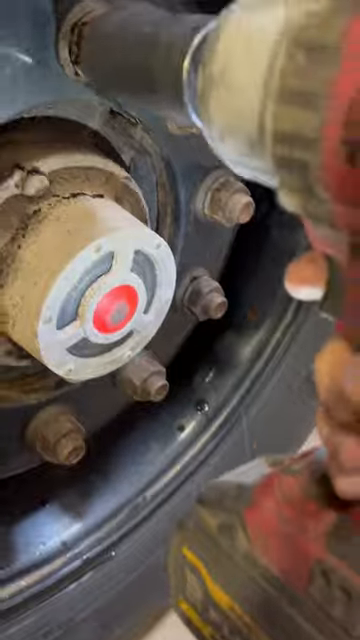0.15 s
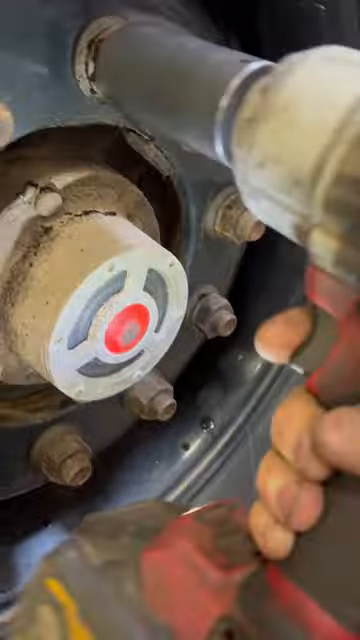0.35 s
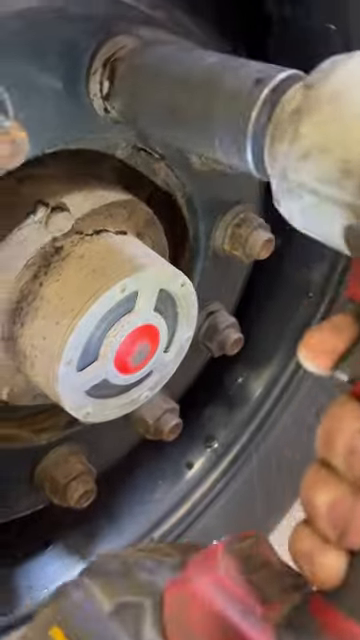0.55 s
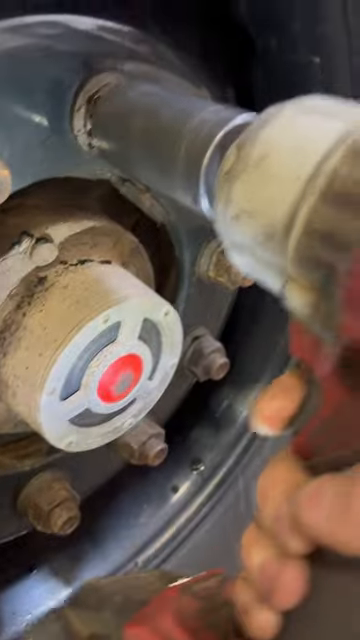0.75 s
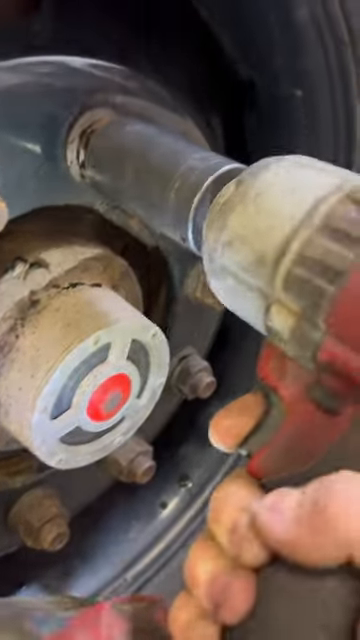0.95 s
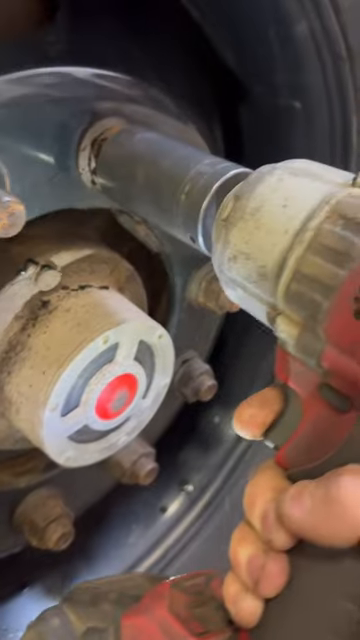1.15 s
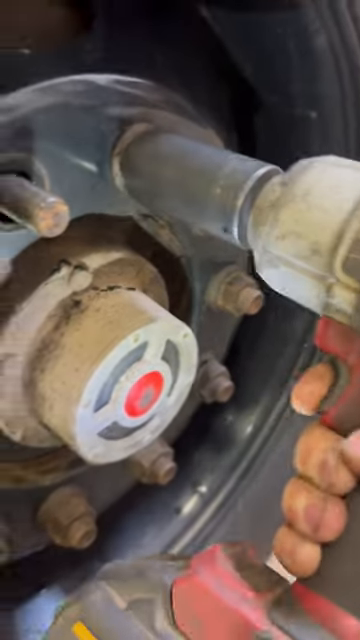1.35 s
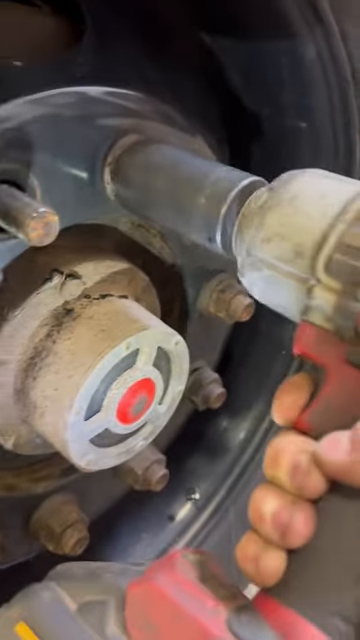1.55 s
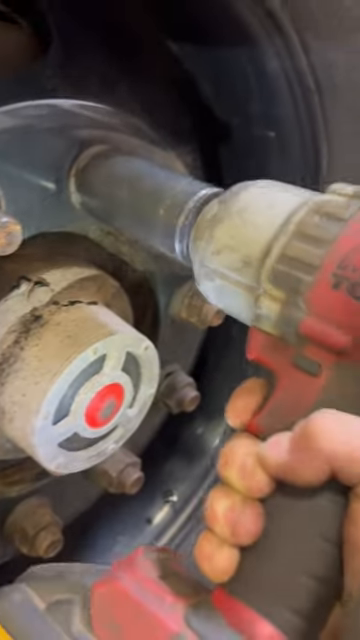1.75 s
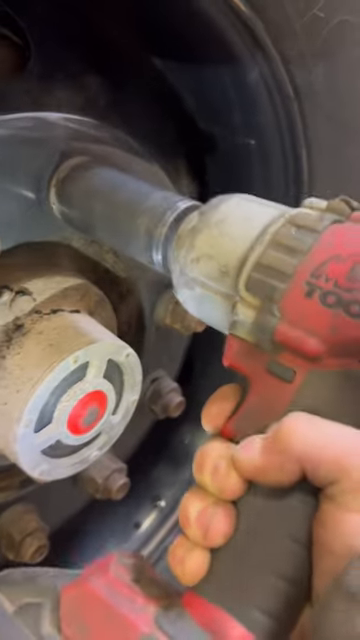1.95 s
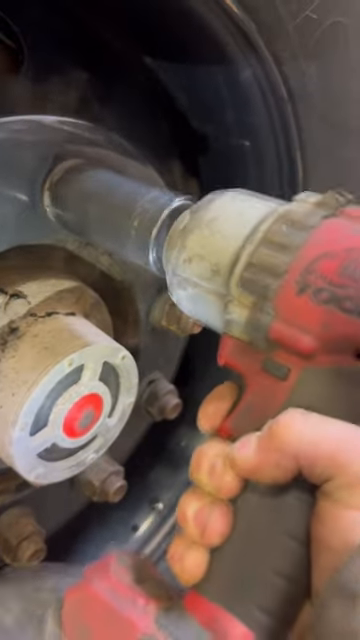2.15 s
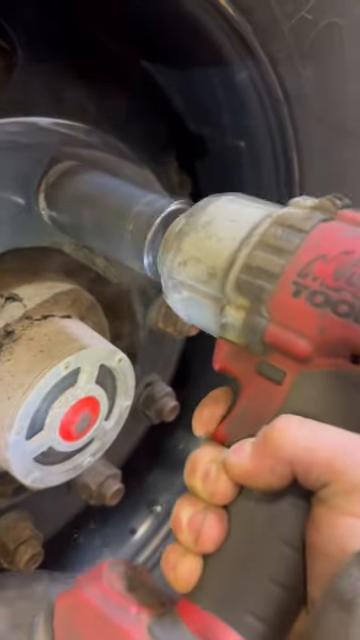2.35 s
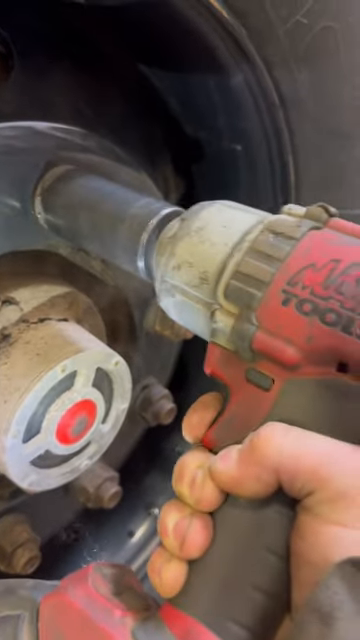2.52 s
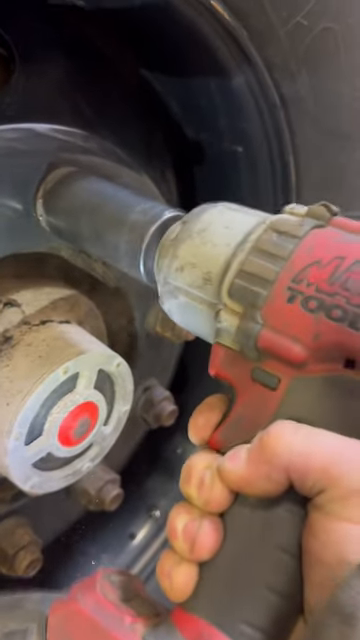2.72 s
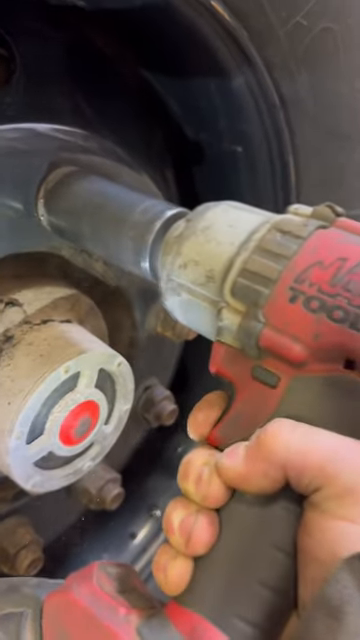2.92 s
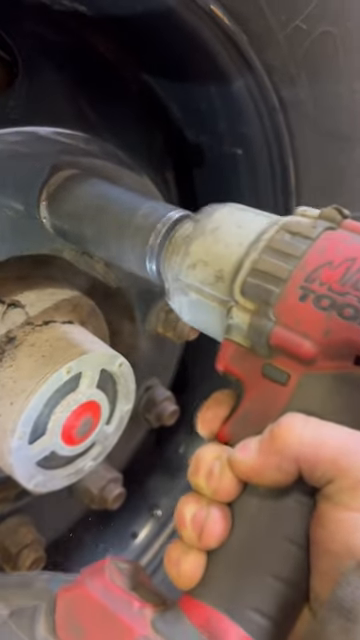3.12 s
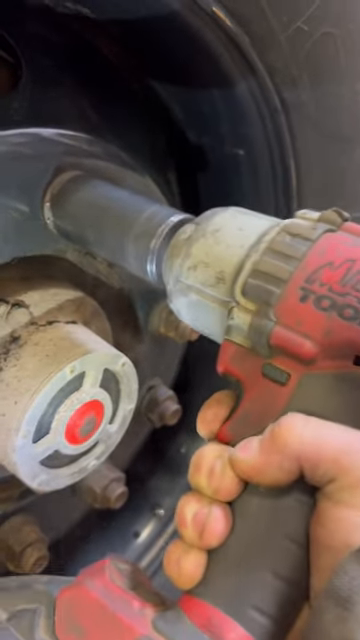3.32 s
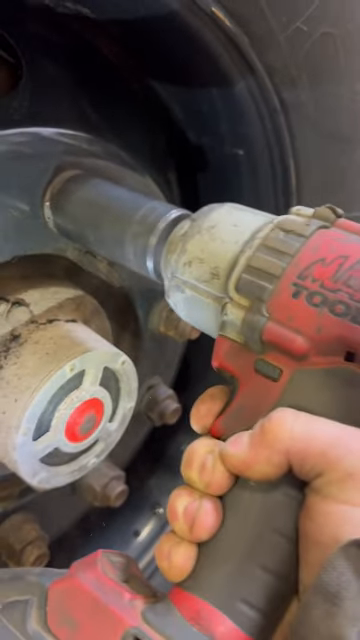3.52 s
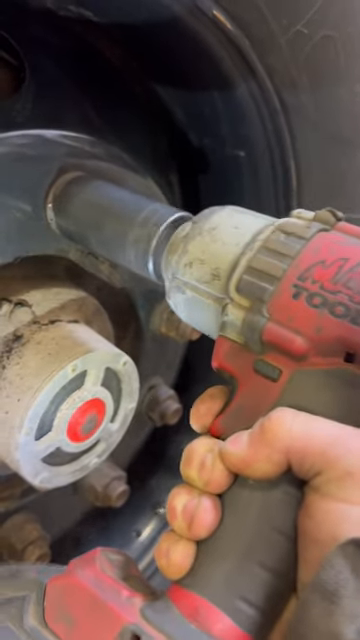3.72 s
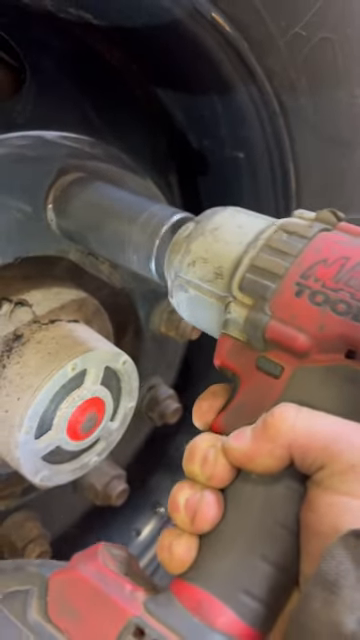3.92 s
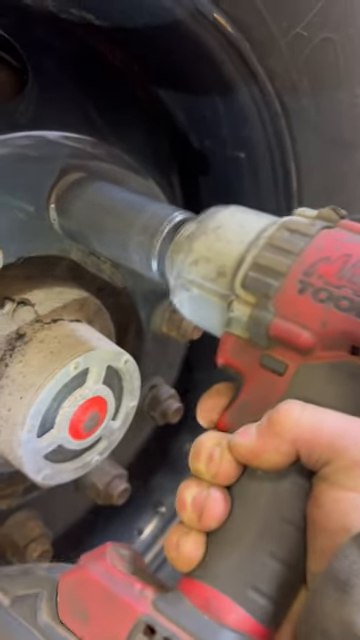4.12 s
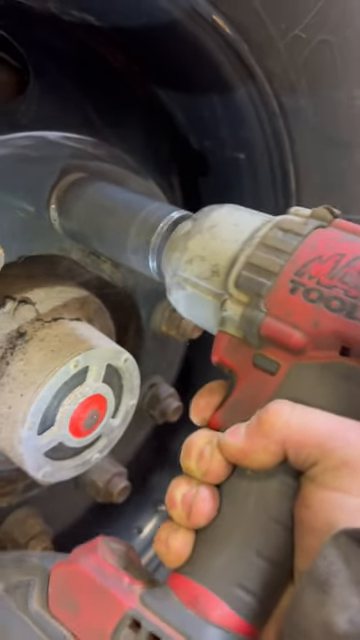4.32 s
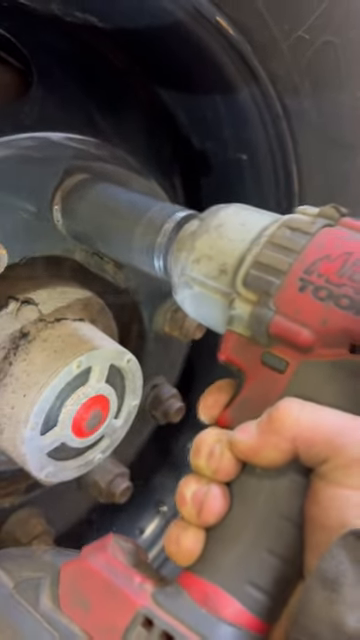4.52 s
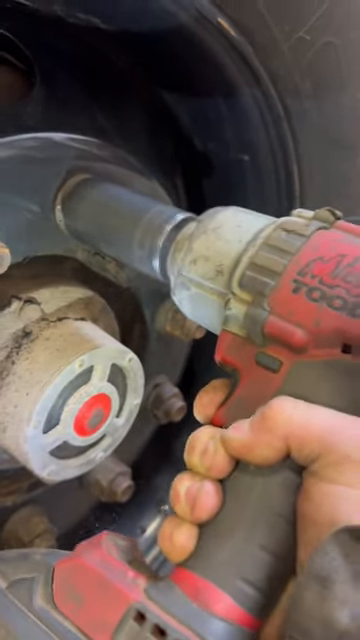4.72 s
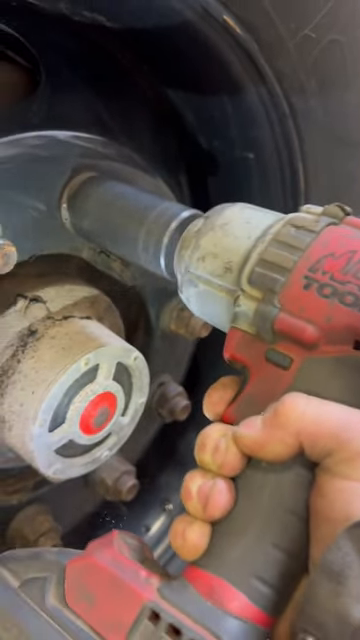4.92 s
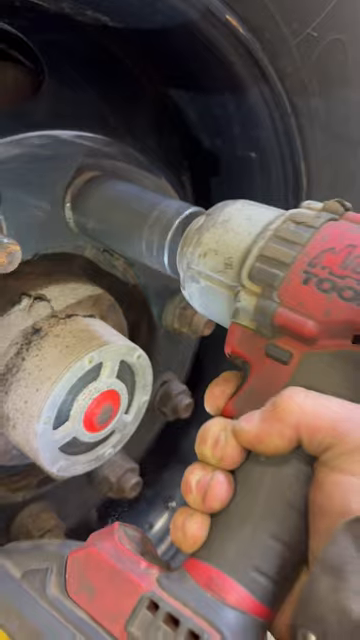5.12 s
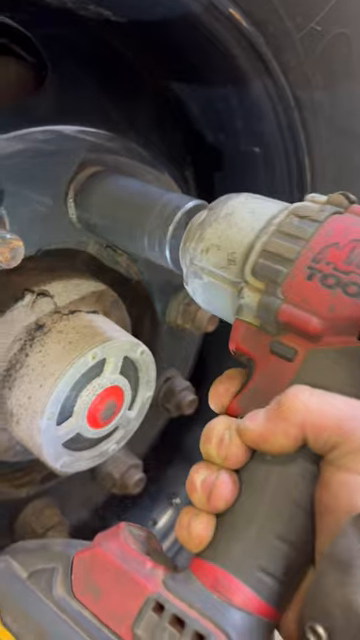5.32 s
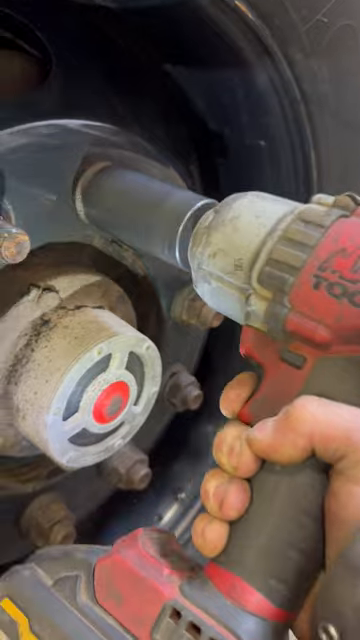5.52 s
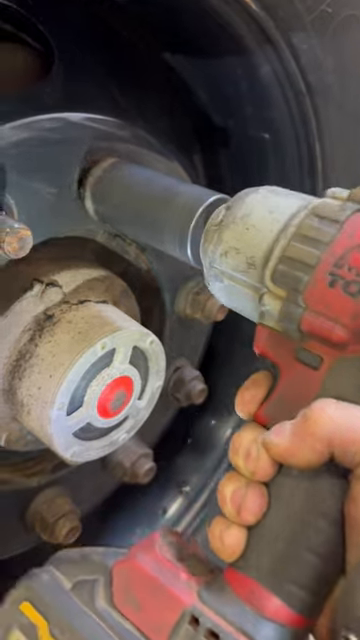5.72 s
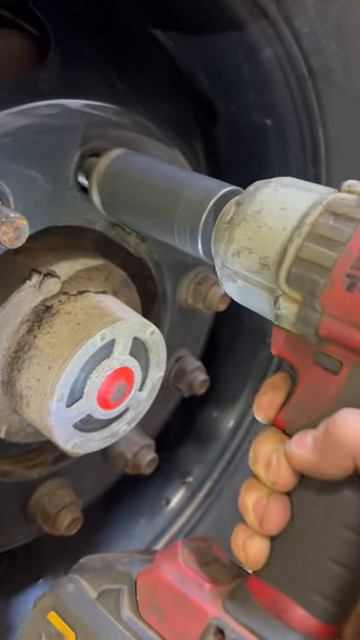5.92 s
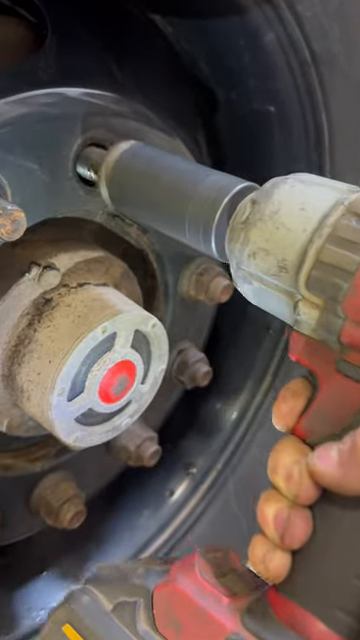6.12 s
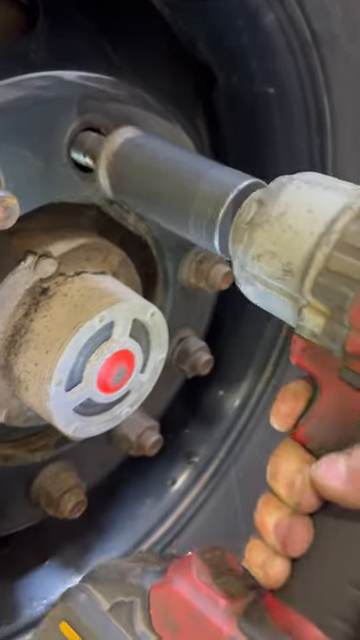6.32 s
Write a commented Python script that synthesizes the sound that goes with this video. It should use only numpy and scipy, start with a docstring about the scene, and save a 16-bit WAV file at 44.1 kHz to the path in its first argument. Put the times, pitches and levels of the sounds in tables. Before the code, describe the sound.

Close up in a quiet, faintly humming garage, a loose metal socket ticks, knocks and slides onto a truck wheel nut, ending in one hard clack. A cordless impact wrench bursts into dense, loud hammering, heaviest at first, then steady and slightly quickening. The blows turn uneven and stop as the nut loosens, leaving a much quieter whining motor.

```python
"""A socket knocks, ticks and slides onto a truck wheel nut, then a cordless impact wrench rattles on it about
46 times a second; the nut comes free and the motor whines without load. Heard close by through two ports.
Hits are bursts of signed noise with rebounds, ringing socket, anvil and wheel modes; sliding and whirr are
coloured noise; the free motor is sine tones with throbbing gear mesh."""
import sys
import numpy as np
from scipy import signal
from scipy.fft import rfft, irfft, next_fast_len
from scipy.io import wavfile

SR = 44100
rng = np.random.default_rng(int(sys.argv[2]) if len(sys.argv) > 2 else 0)


def store_pcm(level_fs):
    """Save levels as 16-bit WAV."""
    pcm = np.round(np.clip(level_fs, -1, 1) * 32767).astype(np.int16)
    wavfile.write(sys.argv[1], SR, np.atleast_2d(pcm).T)


N = 284886

# Socket and anvil modes. Each row: frequency in Hz, relative level in dB, t60 in s (seating stretches it).
SOCKET_MODES = [(3360, -35.5, 0.21), (5640, -21.5, 0.073), (6170, -25, 0.044), (6930, -14.5, 0.022),
                (8600, -33, 0.099), (9100, -39, 0.018), (8300, -5.5, 0.04), (8360, -12.5, 0.012),
                (8470, -12.5, 0.0089), (8407, -14, 0.034)]
# Wheel disc modes. Each row: frequency in Hz, relative level in dB, t60 in s (hammering shortens it).
WHEEL_MODES = [(432, -4.5, 0.25), (451, -5.5, 0.17), (832, -9, 0.07), (1009, -9.5, 0.079)]
# Brief modes of ticks and rasp. Each row: frequency in Hz, relative level in dB, t60 in s.
TICK_MODES = [(2720, -1, .014), (3440, 2, 0.013), (3850, -3, 0.013), (6030, -9, .01), (7600, -13, .008)]


def amp(db):
    """Amplitude factor of a level in dB."""
    return 10 ** (np.asarray(db) / 20)


def rms_one(x):
    """Scales a signal to an rms of 1."""
    return x / np.sqrt(np.mean(x ** 2) + 1e-20)


def in_time(rows):
    """Interpolates each column after the first (seconds) to one value per sample."""
    s, *columns = np.transpose(rows)
    return [np.interp(np.arange(N) / SR, s, c) for c in columns]


def at_hz(points, hz):
    """Interpolates (Hz, value) points over log frequency."""
    hz_points, values = np.transpose(points)
    return np.interp(np.log(hz + 1), np.log(hz_points), values)


def colour(x, spectrum):
    """Minimum-phase filter with the given spectral shape; white noise keeps its rms."""
    cepstrum = irfft(np.log(amp(at_hz(spectrum, np.linspace(0, SR / 2, 4097)))))
    cepstrum[1:4096] *= 2      # folding makes it causal
    response = irfft(np.exp(rfft(cepstrum[:4097], 8192)))
    return signal.fftconvolve(x, response / np.linalg.norm(response))[:N]


def filtered(x, order, hz, kind):
    """Butterworth filter."""
    return signal.sosfilt(signal.butter(order, hz, kind, fs=SR, output="sos"), x)


def ring(x, hz, t60):
    """Damped resonator: a unit click starts a sine of height 1."""
    r, w = amp(-60 / (t60 * SR)), 2 * np.pi * hz / SR
    return signal.lfilter([0, np.sin(w)], [1, -2 * r * np.cos(w), r * r], x + 1e-18)


def clicks(times, sizes):
    """Single-sample impulses at the given seconds."""
    out = np.zeros(N)
    np.add.at(out, np.minimum((times * SR).astype(int), N - 1), sizes)
    return out


def fading(x, t60):
    """Each click starts an exponential decay."""
    return signal.lfilter([1], [1, -amp(-60 / (t60 * SR))], x + 1e-18)


def drift(rate_hz):
    """Low-passed noise of rms 1 that wanders at about the given rate."""
    r = np.exp(-2 * np.pi * rate_hz / SR)
    return rms_one(signal.lfilter([1], [1, -2 * r, r * r], rng.standard_normal(N + SR))[SR:])


def chatter(times, level_db, fade_db_per_ms, spread_s, rebound_db, uneven_db, t60, tail_db, tail_t60, rise_s):
    """A first contact and five rebounds per hit; each is a fast-dying noise burst with a longer tail."""
    late_s = spread_s * np.cumsum(rng.uniform(0.34, 1.473, (len(times), 5)), axis=1)
    fade_db = np.reshape(fade_db_per_ms, (-1, 1)) * 10 ** 3 * late_s
    uneven = rng.normal(0, uneven_db, late_s.shape)
    rebounds = amp(level_db[:, None] + rebound_db - fade_db + uneven)
    contacts = clicks(times, amp(level_db))
    contacts = contacts + clicks((times[:, None] + late_s).ravel(), rebounds.ravel())
    envelope = fading(contacts, t60) + amp(tail_db) * fading(contacts, tail_t60)
    rise = np.exp(-1 / (rise_s * SR))      # the faces take a moment to close
    return signal.lfilter([1 - rise], [1, -rise], envelope) * rng.choice([-1., 1.], N)


def garage():
    """Steady room noise, mostly low."""
    # Each row: frequency in Hz, relative density in dB.
    garage_colour = [(18, -55), (30, -15), (87, -32), (101, 9), (122, 4), (240, 0.5), (420, -38),
                     (642, -43), (3000, -45), (3900, -69), (6600, -120)]
    return amp(-70) * colour(rng.standard_normal(N), garage_colour)


def grip():
    """The grip shifts: smooth pushes of the hand make soft low bumps."""
    # Each row: start in seconds, level in dB before the high-pass.
    bumps = [(6.125, -59), (6.16, -59), (6.222, -55), (6.285, -47), (6.34, -44)]
    bump_s = 0.0083
    s, bump_db = np.transpose(bumps)
    push = signal.fftconvolve(clicks(s, amp(bump_db)), np.hanning(int(bump_s * SR)))[:N]
    return filtered(push, 2, 45, "high")


def ticks():
    """Small ticks of the loose socket: short contacts ring brief modes, each with a random strength."""
    # Each row: time in seconds, relative level in dB.
    tick_rows = [(0.055, -36), (0.3744, -43), (0.5644, -49), (0.6244, -40), (0.6764, -46), (0.7497, -41),
                 (0.7851, -40), (0.7994, -46), (0.828, -51), (0.8435, -47), (0.8617, -51), (0.8804, -50),
                 (0.9143, -56), (0.9742, -56), (1.0445, -53), (1.2426, -53), (1.2571, -46)]
    s, tick_db = np.transpose(tick_rows)
    chance_db = rng.normal(0, 2.5, (len(s), len(TICK_MODES)))
    noise = rng.choice([-1., 1.], N)
    out = 0
    for k, (hz, mode_db, t60) in enumerate(TICK_MODES):
        contact = fading(clicks(s, amp(tick_db + mode_db - 19.5 + chance_db[:, k])), 0.0045)
        out = out + ring(noise * contact, hz, t60)
    return out


def seating():
    """Knocks are a bright tick and a soft push that rings the wheel; the socket slides in grains of noise."""
    # Knocks on nut and stud. Each row: time in seconds, relative tick, wheel thud and tyre boom levels in dB.
    knocks = [(0.041, -32, -40, -42), (0.1208, -28, -37, -42), (0.312, -49, -43, -54),
              (0.342, -49, -73, -68), (0.3547, -50.5, -63, -60), (0.4425, -42, -60, -62),
              (0.4487, -33, -53, -51), (0.5094, -20.5, -41.5, -40), (0.525, -51, -48, -53),
              (0.631, -39.5, -57, -53), (0.648, -38, -45, -38.5), (0.715, -24, -29.5, -28),
              (1.27, -59, -58, -52), (1.2859, -16, -17, -23), (6.2607, -45, -67, -72),
              (6.3456, -44, -61, -76), (6.4073, -44, -80, -77)]
    # Socket sliding on steel. Each row: time in seconds, hiss and rasp levels in dB.
    sliding = [(0, -75, -84), (.118, -61, -77), (.43, -63, -91), (.46, -56, -51), (.55, -65, -59),
               (.6, -64, -68), (.7, -47, -61), (.77, -62, -62), (.82, -59.5, -71), (1.2, -72.5, -82),
               (1.275, -45.5, -78), (1.335, -60, -52), (1.4, -66, -41), (1.45, -80, -80)]
    # Each row: frequency in Hz, relative density in dB.
    knock_colour = [(180, -20), (300, -16.5), (950, -9), (1360, -9), (2990, -12.5), (3280, -12.5),
                    (4980, -19.5), (7440, -14), (10400, -25), (12000, -67), (15600, -70), (22000, -120)]
    # Each row: frequency in Hz, relative density in dB.
    slide_colour = [(180, -20), (300, -17), (418, -11.5), (609, -23.5), (1780, -28), (3550, -35.5),
                    (4950, -37), (6300, -37), (11000, -45), (14300, -92), (22000, -120)]
    tyre_hz, tyre_t60_s = 170, 0.66
    s, peak_db, thud_db, boom_db = np.transpose(knocks)
    force = chatter(s, peak_db, fade_db_per_ms=3.1, spread_s=0.0066, rebound_db=-4.0, uneven_db=2.5,
                    t60=0.021, tail_db=-23.5, tail_t60=0.18, rise_s=0.00063)

    contact = clicks(s, amp(thud_db))
    contact = contact + amp(-25.5) * fading(contact, 0.17) * rng.standard_normal(N)
    push = filtered(contact, 2, [140, 1300], "band")
    wheel = sum(ring(push * amp(mode_db - 9.5), hz, t60) for hz, mode_db, t60 in WHEEL_MODES)
    thump = ring(push, 264, 0.029) + ring(push, 450, 0.022)
    boom = amp(-12.5) * ring(clicks(s, amp(boom_db)), tyre_hz, tyre_t60_s)
    socket = sum(amp(mode_db - 43) * ring(force, hz, t60 * 2.8) for hz, mode_db, t60 in SOCKET_MODES)

    grains = rms_one(rng.standard_normal(N) * amp(2.4 * drift(150) + 0.44 * drift(24)))
    hiss_db, rasp_db = in_time(sliding)
    hiss = amp(hiss_db) * colour(grains, slide_colour)
    rasp = sum(amp(mode_db + 3.6 * drift(25)) * ring(grains, hz, t60) for hz, mode_db, t60 in TICK_MODES)
    return colour(force, knock_colour) + wheel + thump + boom + socket + hiss + amp(rasp_db) * rms_one(rasp)


def motor():
    """Fan and bearing noise in housing modes; once free, two tones and gear mesh throbbing per socket turn."""
    # Each row: time in seconds, whirr level in dB.
    whirr_rows = [(1.33, -72), (1.39, -31), (1.415, -37), (1.5, -29), (2.2, -33.5), (5.3, -38.5),
                  (5.56, -40.5), (5.62, -48), (5.9, -47.5), (6.35, -48.5), (6.46, -50)]
    # Each row: frequency in Hz, relative density in dB.
    whirr_colour = [(120, -49), (200, -22), (430, -11.5), (540, -23.5), (700, -17.5), (850, -10.5),
                    (1300, -10.5), (1850, -12), (2290, -4.5), (2700, -8.5), (3300, -4.5), (3750, -11),
                    (4250, -9), (4600, -7.5), (4950, -13), (5250, -9), (5600, -8.5), (7100, -13.5),
                    (7640, -7), (11200, -20.5), (11900, -101), (13700, -80), (15100, -24), (15900, -20.5)]
    # Each row: frequency in Hz, level in dB relative to the coloured noise, t60 in s.
    housing_modes = [(2450, -27, 0.01), (3960, -16, 0.0032), (4450, -19, .012), (6130, -13, 0.0034)]
    # Free running. Each row: time in seconds, levels of tone, seventh harmonic, low mesh and high mesh in dB,
    # tone in Hz.
    free_rows = [(5.6, -63, -63, -58, -57, 926), (5.645, -60, -54, -51, -48, 938),
                 (5.69, -60, -51, -51, -58, 955), (5.745, -50, -47, -47, -55, 983),
                 (5.84, -54, -55, -48, -50, 1010), (5.91, -55, -60, -51, -50, 1022),
                 (5.96, -67, -50, -50, -49, 1029), (6.08, -56, -41.5, -53, -54, 1041),
                 (6.2, -58, -43, -62, -65, 1050), (6.388, -58, -47, -72, -66, 1046),
                 (6.46, -54, -61, -65, -61, 865)]
    # Faint singing of the loose socket. Each row: time in seconds, level in dB.
    loose_rows = [(5.6, -64), (6.05, -65), (6.2, -55), (6.3, -52), (6.46, -52)]
    # Low rumble as the grip shifts. Each row: time in seconds, level in dB.
    rumble_rows = [(5.6, -80), (5.68, -85), (5.9, -75), (6.1, -67), (6.15, -66), (6.37, -68), (6.42, -87)]
    rumble_colour = [(20, -20), (60, 23), (130, -5), (300, -27), (600, -53)]   # (Hz, relative dB)
    free_at_s, throb_peak_s, throb_db, motor_cycles_per_throb = 5.58, 5.947, 7, 32

    tone_db, seventh_db, mesh_db, upper_db, hz = in_time(free_rows)
    since_s = np.maximum(np.arange(N) / SR - free_at_s, 0)
    free = np.minimum(since_s / 0.029, 1)
    phase = 2 * np.pi * np.cumsum(hz) / SR
    tones = amp(tone_db + 3.0 * drift(25)) * np.sin(phase + 0.77 * drift(30))
    tones = tones + amp(seventh_db) * np.sin(7 * phase)

    turn = (phase - phase[int(throb_peak_s * SR)]) / motor_cycles_per_throb
    depth_db = throb_db * np.clip(since_s / 0.4, 0, 1)
    throb = amp(depth_db * (np.cos(turn + .3 * drift(8)) - 0.2) + 1.6 * drift(60))
    mesh = amp(mesh_db) * np.sin(1.52 * phase + 1.2 * drift(72))
    mesh = mesh + amp(upper_db) * np.sin(3.0 * phase + 0.51 * drift(60))

    air = rng.standard_normal(N) * amp(1.34 * drift(54))
    housing = sum(amp(mode_db) * rms_one(ring(air, mode_hz, t60)) for mode_hz, mode_db, t60 in housing_modes)
    running = np.arange(N) > whirr_rows[0][0] * SR
    whirr = amp(in_time(whirr_rows)[0]) * running * (colour(air, whirr_colour) + housing)

    singing = rms_one(sum(amp(mode_db) * ring(air, mode_hz, t60) for mode_hz, mode_db, t60 in SOCKET_MODES))
    loose = amp(in_time(loose_rows)[0] + 3.9 * drift(30)) * singing
    rumble_amp = amp(in_time(rumble_rows)[0] + 3.6 * drift(22))
    rumble = rumble_amp * colour(rng.standard_normal(N), rumble_colour)
    return whirr + free * (tones + throb * mesh + loose + rumble)


def blows():
    """Steady blows fall where the running count passes a whole number; uneven stumbles are added."""
    # Steady hammering quickens as the nut yields. Each row: time in seconds, blows per second.
    rate = [(1.5585, 44.631), (2.2, 44.907), (2.7, 45.474), (3.1, 45.368), (3.6, 45.98), (4.1, 46.235),
            (4.5, 46.854), (4.9, 46.812), (5.25, 47.467)]
    # Steady blows. Each row: time in seconds, force in dB.
    force_rows = [(1.55, -11), (1.95, -7), (2.1, -11.5), (2.6, -14.5), (3.1, -16.5), (3.38, -18),
                  (3.5, -16.5), (4.3, -16.5), (4.7, -18), (5.25, -17)]
    # Steady blows that differ from their neighbours. Each row: time in seconds, force change in dB,
    # rebound fade in dB per ms.
    distinct = [(2.183, -1.5, 0), (2.404, -5, -0.2), (2.472, 1.5, 1.3), (2.604, 5, 6), (2.914, -1, 2.5),
                (3.001, .4, 6), (3.023, -0.5, 0.3), (3.421, 4, 6.5), (3.701, 1, 1.4), (3.941, 3.5, 3),
                (4.003, -1, 0.5), (4.392, -0.5, .8), (4.521, -1, 0.1), (4.652, -2, 13), (4.671, 3.5, 3.5),
                (4.693, -1.5, 3)]
    # Blows while the tool spins up and the nut breaks loose. Each row: time in seconds, force in dB.
    stumbles = [(1.4077, -9), (1.423, -11.5), (1.449, -5.5), (1.4813, -8), (1.508, -7), (1.534, -8),
                (5.268, -15.5), (5.292, -14), (5.3166, -15.5), (5.3417, -24), (5.359, -19.5), (5.376, -22),
                (5.391, -15.5), (5.409, -20), (5.423, -21), (5.44, -15), (5.452, -25), (5.4698, -14),
                (5.489, -24), (5.506, -17.5), (5.523, -17), (5.541, -16.5), (5.558, -40), (5.567, -28),
                (5.572, -41), (1.399, -22), (1.471, -17), (5.33, -21)]
    jitter_s, uneven_db = 0.0004, 0.5
    steady_fade, stumble_fade = 1.93, 4.1      # dB per ms
    fade_spread = 0.31      # natural log
    t = np.arange(rate[0][0], rate[-1][0], 1 / SR)
    count = np.cumsum(np.interp(t, *np.transpose(rate))) / SR
    steady_s = np.interp(np.arange(int(count[-1]) + 1), count, t)
    chance = rng.standard_normal((len(steady_s), 3))
    force_db = np.interp(steady_s, *np.transpose(force_rows)) + uneven_db * chance[:, 0]
    steady_s = steady_s + jitter_s * chance[:, 1]
    fade = steady_fade * np.exp(fade_spread * chance[:, 2])
    for distinct_s, change_db, own_fade in distinct:
        nearest = np.argmin(abs(steady_s - distinct_s))
        steady_s[nearest] = distinct_s
        force_db[nearest] += change_db
        fade[nearest] = own_fade
    s, stumble_db = np.transpose(stumbles)
    fades = np.append(fade, np.full(len(s), stumble_fade))
    return np.append(steady_s, s), np.append(force_db, stumble_db), fades


def shifting(x):
    """Splits the sound into four bands, each with a level that wanders on its own."""
    lows = [filtered(x, 1, hz, "low") for hz in (1900, 4600, 10700)]
    bands = np.diff([0 * x, *lows, x], axis=0)
    return sum(band * amp(0.9 * drift(23)) for band in bands)


def hammer():
    """Blows crack through the tool, ring socket and anvil, shake the wheel; the hammer ticks as it lifts."""
    # Shaking of wheel and grip. Each row: time in seconds, relative low shake, socket and wheel ring in dB.
    shaking = [(1.4, -37, -54, -25.5), (1.56, -27.5, -19, -18), (1.9, -27.5, -36, -25),
               (2.03, -35, -23, -40), (3.2, -40, -14, -42.5), (3.77, -37.5, -19.5, -40),
               (4.8, -42, -17, -44), (5.3, -46, -23.5, -34), (5.58, -63, -23.5, -31.5)]
    # Each row: frequency in Hz, relative density in dB.
    blow_colour = [(150, -47.5), (250, -15.5), (734, -16), (1090, -6), (1420, -10.5), (1660, -6),
                   (3450, -4.5), (4960, -9.5), (5700, -3.5), (7530, -3.5), (8360, -4), (10300, -12),
                   (11200, -58), (12300, -34), (15900, -15.5)]
    # Each row: frequency in Hz, relative density in dB.
    shake_colour = [(25, -10), (45, -2), (75, 5), (110, 3.5), (200, 3), (500, -2), (1000, -4.5),
                    (2000, -36)]
    # Anvil and nut. Each row: frequency in Hz, relative level in dB, t60 in s.
    anvil_modes = [(1086, -31.5, 0.01), (1796, -26.5, 0.012), (2260, -32.5, 0.025), (2613, -27.5, 0.015),
                   (3600, -29, 0.0023), (4540, -30.5, 0.0062)]
    # How far anvil and nut ring out. Each row: time in seconds, relative level in dB.
    anvil_ring = [(1.4, 0.5), (1.9, -3), (2.2, -16.5), (4.2, -14.5), (4.8, -13), (5.58, -2.5)]
    s, level_db, fade = blows()
    shake_db, socket_db, wheel_db = in_time(shaking)
    force = chatter(s, level_db, fade, spread_s=0.002, rebound_db=-2.5, uneven_db=1.7,
                    t60=0.0093, tail_db=-22.0, tail_t60=0.14, rise_s=0.00072)

    lift_s = s + rng.normal(0.014, 0.00046, len(s))
    lifts = clicks(lift_s, amp(level_db - 4.5 + rng.normal(0, 3.7, len(s))))
    tick = filtered(fading(lifts, 0.0063) * rng.standard_normal(N), 2, [4500, 8000], "band")

    # every mode's level wanders
    socket = sum(ring(force * amp(mode_db + 4.7 * np.tanh(drift(28))), hz, t60)
                 for hz, mode_db, t60 in SOCKET_MODES)
    anvil = sum(ring(force * amp(mode_db + 8.2 * np.tanh(drift(30))), hz, t60)
                for hz, mode_db, t60 in anvil_modes)

    gate = 0.16 + fading(clicks(s, amp(rng.normal(0, 2.8, len(s)))), 0.026)
    hammering = (np.arange(N) > s.min() * SR) * (np.arange(N) < s.max() * SR)
    jolts = gate * hammering * rng.standard_normal(N)
    # the pressed socket damps the wheel
    wheel = sum(amp(mode_db - 33.0) * ring(jolts, hz, 0.95 * t60) for hz, mode_db, t60 in WHEEL_MODES)
    shake = amp(shake_db + 8.0) * colour(jolts, shake_colour) + amp(wheel_db) * wheel

    crack = force * (0.46 + fading(clicks(s, 0.76), 0.031))      # dies sooner than the socket sings
    ringing = amp(socket_db) * socket + amp(in_time(anvil_ring)[0]) * anvil
    return shifting(colour(crack, blow_colour)) + tick + ringing + shake


def ports(mid):
    """Two ports differ by a quarter-cycle side signal, a lean in level and scattered sound that wanders."""
    # Each row: frequency in Hz, gain of the side signal in dB.
    side_gain = [(60, -22), (99, -32), (160, -10), (270, -16), (450, -2.5), (740, -0.5), (1220, -9.5),
                 (2010, -17.5), (3330, -2), (5500, -12), (9080, 0.5), (15000, 15.5)]
    # Each row: frequency in Hz, power share (0-1) of the side that is scattered sound.
    scatter = [(500, 0.92), (6000, 0.54), (8400, 0.55), (10000, 0), (12000, 0.27)]
    # Each row: frequency in Hz, left minus right in dB.
    left_louder = [(60, -1.5), (110, 0.5), (200, -0.5), (380, 7.5), (700, -1), (1290, -2), (2380, 1),
                   (4400, 2.5), (8120, -1), (15000, 4)]
    size = next_fast_len(N + 4096)
    hz = np.arange(size // 2 + 1) * SR / size
    mid_spectrum = rfft(mid, size)
    echoes = rng.standard_normal(2000) * amp(-60 * np.arange(2000) / (0.018 * SR))
    scattered = rfft(mid * drift(11.1), size) * rfft(echoes / np.linalg.norm(echoes), size)
    share = np.clip(at_hz(scatter, hz), 0, 1)
    paths = -1j * np.sqrt(1 - share) * mid_spectrum + np.sqrt(share) * scattered
    lean = np.tanh(np.log(amp(at_hz(left_louder, hz))) / 2) * mid_spectrum
    side = irfft(paths * amp(at_hz(side_gain, hz)) + lean, size)[:N]
    return np.array([mid + side, mid - side])


def scene():
    """Sums all sources and spreads them over the two ports."""
    return ports(garage() + grip() + ticks() + seating() + motor() + hammer())


def record(dry):
    """The lows come late (each hit bends downward), peaks are rounded, the top is cut."""
    lag_cycles, cutoff_hz = 1.1, 15850      # delay is lag_cycles / (hz + 40) seconds
    size = next_fast_len(N + 8192)
    hz = np.arange(size // 2 + 1) * SR / size
    lag = np.exp(-2j * np.pi * lag_cycles * np.log1p(hz / 40))
    late = irfft(rfft(dry, size) * lag, size)[:, :N]
    rounded = 1.5 * np.tanh(late / 1.5)
    return signal.sosfilt(signal.ellip(12, .5, 70, cutoff_hz, fs=SR, output="sos"), rounded)


dry = scene()
out = record(dry)
store_pcm(out)
```